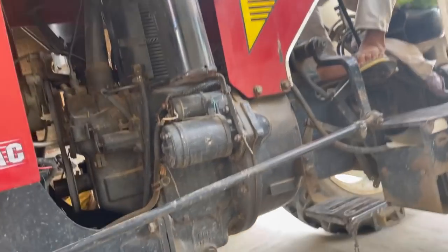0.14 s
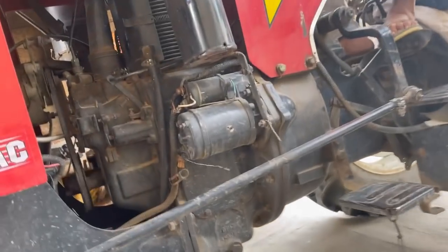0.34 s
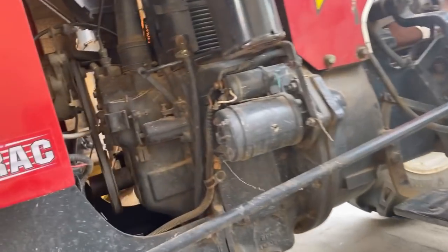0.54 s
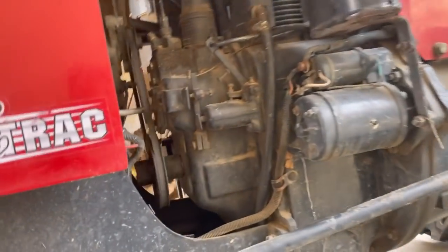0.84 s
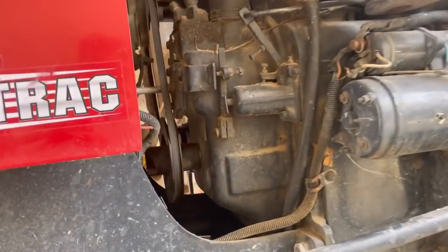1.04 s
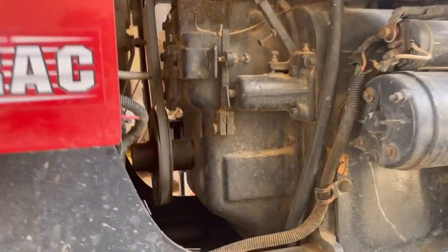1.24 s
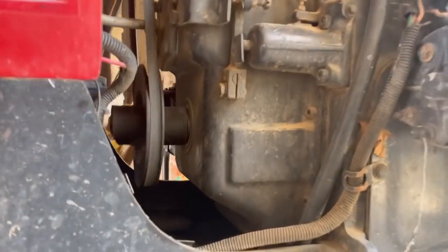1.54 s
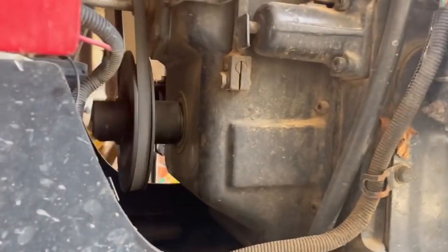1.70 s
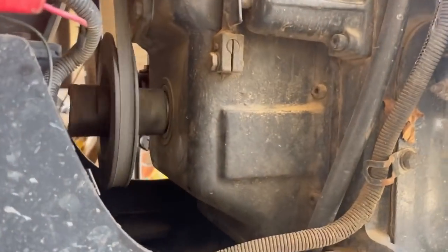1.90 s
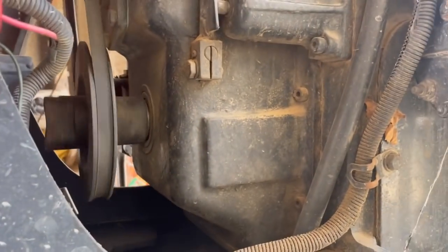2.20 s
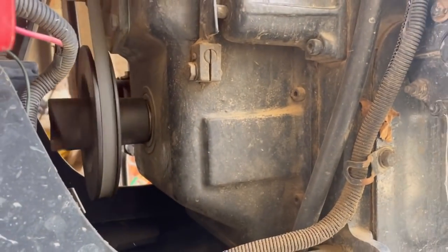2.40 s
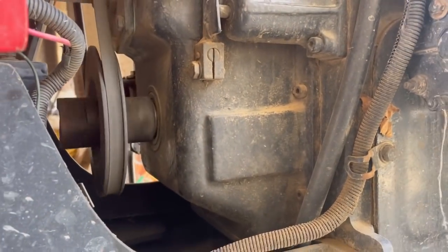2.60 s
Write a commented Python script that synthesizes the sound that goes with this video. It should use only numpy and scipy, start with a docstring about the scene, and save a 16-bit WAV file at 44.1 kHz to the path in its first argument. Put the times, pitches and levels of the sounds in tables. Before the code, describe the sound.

Close tractor engine idle: steady hollow thumps, metallic ticks, loose clanks and a few hard knocks.

```python
"""A single-cylinder tractor diesel idles at about seven cycles a second, heard from close beside the block.
Gusty low rumble and gear clatter run throughout; each cycle brings a hollow thump, then injector, valve and
tappet ticks. It fires hard early on: a knock, and a bright metal clack one crank turn later. Loose parts clank
through the middle; two more hard firings follow. Metal is rung modes; the rest is coloured noise and low tones."""
import sys
import numpy as np
from scipy import signal
from scipy.fft import rfft, irfft
from scipy.io import wavfile

SR = 44100
rng = np.random.default_rng(int(sys.argv[2]) if len(sys.argv) > 2 else 0)


def dump(signal):
    """Clip the signal to [-1, 1] and save it as 16-bit WAV at the path in sys.argv[1]."""
    limited = np.clip(np.atleast_2d(signal).T, -1, 1)
    pcm = np.round(limited * 32767).astype(np.int16)
    wavfile.write(sys.argv[1], SR, pcm)


N = 121275
TIME_S = np.arange(N) / SR
FREQ_HZ = np.maximum(np.arange(N // 2 + 1) * SR / N, 1)

# All dB are relative: each source adds its own gain.
# deep rumble level: time_s, level_db
DEEP_LEVEL = [(0.0, -23), (0.03, -34), (0.08, -36), (0.24, -23.5), (0.39, -26), (0.47, -26), (0.58, -25),
              (0.66, -34), (0.78, -21.5), (0.8, -32), (0.9, -31.5), (0.95, -23.5), (1.07, -25), (1.26, -28),
              (1.39, -25), (1.42, -37), (1.51, -23), (1.54, -30.5), (1.65, -29.5), (1.78, -45), (1.9, -22),
              (2.14, -30), (2.25, -28), (2.27, -23), (2.38, -31), (2.75, -35.5)]
# low boom level: time_s, level_db
BOOM_LEVEL = [(0.0, -37), (0.13, -45), (0.16, -27), (0.47, -26.5), (0.59, -44), (0.63, -27), (0.98, -34.5),
              (1.0, -24), (1.16, -43), (1.29, -22.5), (1.55, -35), (1.6, -22), (1.78, -30), (1.92, -21.5),
              (2.1, -38), (2.21, -23.5), (2.33, -30.5), (2.75, -32)]
# rumble and boom spectra: freq_hz, density_db
DEEP_COLOUR = [(15, -34), (31, -22), (40, -1), (55, -3), (80, -4.5), (110, -10.5), (160, -16), (400, -59)]
BOOM_COLOUR = [(50, -43), (100, -6), (125, -5), (165, -2.5), (205, -10.5), (300, -18), (800, -59)]
# low throbs: centre_s, pitch_hz, half_length_s (to 1/e), level_db
THROBS = [(0.022, 44, 0.032, -19.5), (0.192, 68, 0.017, -21.5), (.312, 48, 0.054, -22),
          (.32, 103, 0.02, -20.5), (0.345, 165, 0.012, -22), (0.447, 132, 0.025, -19),
          (0.732, 162, 0.018, -24.5), (1.006, 158, .022, -20), (1.069, 61, 0.057, -21),
          (1.606, 166, .03, -20.5), (1.998, 66, 0.017, -17.5), (2.218, 163, .024, -21),
          (2.275, 60, 0.019, -15.5)]
# midrange rattle spectrum: freq_hz, density_db
MIDRANGE_COLOUR = [(300, -30), (750, -2), (1000, -3.5), (1300, 0), (1900, -5.5), (4000, -36)]
# midrange rattle level: time_s, level_db
MIDRANGE_LEVEL = [(0, -47), (.55, -39), (.75, -34), (1.0, -31), (1.35, -32.5), (1.75, -39), (2.75, -41)]
# clatter and drone level: time_s, level_db
RUNNING_LEVEL = [(0, -2), (.1, -1), (.3, -2.5), (.55, -1), (.78, -1), (.95, 2), (1.1, -1), (1.3, 1.5),
                 (1.58, 2.5), (1.73, 0), (1.9, 0.5), (2.1, -0.5), (2.4, 0), (2.75, -3)]
# gear clatter and drone spectra: freq_hz, density_db
CLATTER_COLOUR = [(100, -14.5), (400, 1), (900, -1), (1500, 0.5), (2200, -2), (3000, -3.5), (4300, -3),
                  (5300, -18.5), (6500, -24), (8500, -27), (12000, -29), (16000, -68)]
DRONE_COLOUR = [(60, -31), (130, -2), (220, -5), (400, 3.5), (620, -4.5), (900, -4), (1400, -6.5),
                (2500, -11.5), (5000, -23.5), (16000, -59)]
# resonances of block and covers: freq_hz, width_hz, gain_db
BLOCK = [(263.3, 17, 5), (308, 12, -15), (494, 71, -9), (767, 85, -0.5), (869, 28, -6), (1139, 20, 6.5),
         (1374, 24, -7.5), (1559, 35, 2.5), (1757, 12, 2.5), (1916, 13, 3.5), (2094, 10, 1.5),
         (2545, 200, -2), (3175, 13, 5), (3469, 22, 3.5), (4740, 41, 2), (5310, 29, 9), (7340, 23, 0)]
# engine cycles: start_s, thump_db, injector_db, valve_db, tappet_db, swell_db
CYCLES = [(-.047, -21, -1, -13, -11, -12), (.092, -16, 2, -2, -3, -3.5), (.228, -7, -0.5, -8, -4.5, -2),
          (.365, -10, -10, -14, -6, 0.5), (.499, -10, -0.5, -3, 0, 1), (.638, -6, 2, -3, -3, 0),
          (.781, -5, 1.5, -0.5, -3, 4.5), (.920, -2.5, 3, -10, -1, 0), (1.066, -5.5, -1.5, 3, -4, -1),
          (1.212, -1, 5.5, -5, 1, 1.5), (1.366, -3.5, 4, 4.5, -2.5, -2.5), (1.519, -4.5, 8, -1, 1.5, 1),
          (1.679, -1.5, 4, 9, -2.5, 1.5), (1.838, -1.5, -1, 3, 7, -1), (1.989, -5, -7, -4, -6, -0.5),
          (2.136, -6, 1, -1, 0, -2.5), (2.279, -3.5, 1, -2, -3, 1.5), (2.415, -4.5, 0, -15, -1.5, -2.5),
          (2.553, -8, -4, -1, -2, 2.5), (2.696, -4, 1, -2, 0, 0.5), (2.838, -4, -2, -4, -2, 19)]
# light tappet ticks late in each cycle: cycle_share, level_db
TAPPETS = [(.73, 1.5), (.88, -2), (.99, -5.5)]
# tick, thud, clack and scrape spectra: freq_hz, density_db
TICK_COLOUR = [(300, -21), (1500, 2), (3500, 1.5), (5500, -2.5), (7000, -1.5), (8600, -0.5), (10500, -1.5),
               (13000, -5), (16000, -24)]
THUD_COLOUR = [(40, -28), (130, -18), (300, -2), (600, 0.5), (1000, -1.5), (1600, -7), (2500, -17.5),
               (5000, -52), (16000, -53)]
CLACK_COLOUR = [(200, 0), (900, -5), (1600, 3.5), (2600, 2), (4000, -5.5), (5500, -4.5), (7500, -12),
                (8700, -6), (10500, -9), (13000, -14), (16000, -38)]
SCRAPE_COLOUR = [(2000, -27), (7000, 4), (11000, 5), (13500, 1), (16000, -14)]
# loose parts clanking: start_s, level_db, loudest_hz
CLANKS = [(.658, -3.5, 3080), (.709, 1, 940), (.738, 0.5, 1350), (.774, -1, 3380), (.905, -3, 1760),
          (0.975, -1, 1230), (1.109, 0.5, 1350), (1.243, 3, 1245), (1.551, 2.5, 3400), (1.627, -1.5, 2900),
          (1.771, 1, 2590)]
# hard firings: knock_s, knock_db, knock_loudest_hz, crack_db, clack_s, clack_db, clack_loudest_hz
FIRINGS = [(.1228, -4.5, 426, -10, .191, -10.5, 1990), (1.872, 1, 700, 0.5, 1.9475, -1.5, 2670),
           (2.165, -3, 620, -2, 2.2338, -7.5, 2340)]
# ringing of thump, clank, knock, hollow tail and clack: pitch_hz, level_db, t60_s
THUMP_MODES = [(164, -7.5, 0.068), (260.7, 3, 0.14), (390, -11, 0.099), (550, -12, 0.055), (730, 6, 0.087),
               (765, -2, 0.045), (840, -7, 0.12), (1120, -23.5, 0.17)]
CLANK_MODES = [(881, 2, .15), (954, -1.5, .1), (1236, -1.5, .12), (1350, -3, 0.16), (1758, 3, 0.2),
               (2580, -1, 0.11), (2930, -4, 0.11), (3150, -5, 0.12), (3420, 1, 0.12)]
KNOCK_MODES = [(414, -5, 0.11), (509, -1, 0.15), (581, -5.5, 0.27), (770, -20, 0.022), (838, -8.5, 0.097),
               (910, -7, .09), (985, -6.5, 0.11), (1144, -2, 0.12), (1237, -10.5, 0.24), (1560, -3.5, 0.2),
               (1820, -17, .15), (2150, -21, .17)]
TAIL_MODES = [(319, 4, .17), (370, -3, 0.11), (450, -18, 0.073), (576, -16, 0.11)]
CLACK_MODES = [(1510, -9, .12), (1845, -4, 0.091), (2066, 1, 0.11), (2386, 3, 0.091), (2575, 3.5, 0.11),
               (2940, -5, 0.15), (3020, -8, 0.091), (3730, -2.5, .11), (4000, -4, 0.17), (5280, -7.5, .1),
               (7330, 1, 0.15)]
# two microphone ports: freq_hz, likeness (0-1), left_lead_rad, left_minus_right_db
PORTS = [(39.8, 0.95, 0, -0.5), (150, 1, -0.85, 1.4), (328, 0.92, 0.02, 1.4), (690, 0.61, 0.48, 1),
         (1410, 0.2, 1.22, 3), (2640, 0.3, 0.33, 0.7), (5030, 0.46, 0.56, 5.5), (6900, 0.43, 1.25, 0),
         (7650, 0.83, 4, 2.5), (10050, 1, 2, -2.5), (11200, 0.57, 1.9, 2.5), (12800, 1, -1.5, -1),
         (16000, 1, 1.5, 2)]

DEEP_DB, BOOM_DB = -1.5, -2.5
DRONE_DB, IMPACTS_PER_S, IMPACT_SCATTER_DB = -26.5, 1100, 3.5
CLATTER_DB, SWELL_DB, SWELL_AT_SHARE = -27, 3, 0.86  # share: of the cycle
BAY_RISE_S, BAY_T60_S, BAY_RIPPLE = 0.0017, 0.05, 0.59  # ripple: exponent on the echo spectrum
TICK_DB, TICK_SCATTER_DB, TICK_RISE_S, TICK_T60_S, TICK_JITTER_S = -35, 1, 0.0023, 0.16, 0.0029
INJECTOR_AT_SHARE, VALVE_AT_SHARE = 0.18, 0.46  # share: of the cycle
STRIKE_RISE_S = .0015
CLANK_DB = -21.5
CLANK_FALL_DB_PER_OCT, KNOCK_FALL_DB_PER_OCT, CLACK_FALL_DB_PER_OCT = 21, 3, 10
THUMP_SPREAD, KNOCK_SPREAD = 0.4, 0.87  # gain of ringing on the unshared paths
THUMP_DB, THUMP_RISE_S, THUMP_DETUNE = -16.5, 0.0037, .022  # detune: sd, fraction of pitch
THUMP_THUD_DB, THUMP_THUD_T60_S = -27, 0.066
SHAKE_HZ, SHAKE_DB, SHAKE_T60_S, SHAKE_RISE_S, SHAKE_LEAD_S = 48, -18, 0.19, 0.012, 0.024
KNOCK_DB, TAIL_DB, TAIL_RISE_S = -8.8, -9.5, 0.033
KNOCK_THUD_DB, KNOCK_THUD_T60_S, CRACK_DB, CRACK_T60_S = -11, .16, -17.5, .08
CLACK_RING_DB, CLACK_NOISE_DB, CLACK_RISE_S, CLACK_T60_S = -9.5, -10.5, .004, .09
SCRAPE_DB, SCRAPE_LEAD_S, SCRAPE_T60_S = -20.5, 0.0037, 0.19
TOP_HZ = 15800


def undb(db):
    """Decibels to gain."""
    return 10 ** (np.asarray(db) / 20)


def unit(x):
    """Scale to rms 1."""
    return x / np.sqrt(np.mean(x ** 2))


def curve(table, axis=1):
    """One column of a time table, joined by straight lines."""
    rows = np.array(table)
    return np.interp(TIME_S, rows[:, 0], rows[:, axis])


def across(table, axis=1):
    """One column of a frequency table, interpolated on a log axis."""
    rows = np.array(table)
    return np.interp(np.log(FREQ_HZ), np.log(rows[:, 0]), rows[:, axis])


def white(channels=3):
    """White noise on three paths: shared by both ports, left only, right only."""
    return rng.standard_normal((channels, N))


def colour(x, spectrum, resonances=()):
    """Give x a spectrum and ringing resonances; rms 1 over all paths."""
    ringing = 1
    for hz, width_hz, db in resonances:
        ringing = ringing + undb(db) / (1 + 2j * (FREQ_HZ - hz) / width_hz)
    return unit(irfft(rfft(x) * undb(across(spectrum)) * ringing, N))


def blow(start_s, rise_s, t60_s):
    """Envelope of a blow: linear rise, then exponential decay."""
    age_s = np.maximum(TIME_S - start_s, 0)
    decay = np.exp(-np.log(1000) * np.maximum(age_s - rise_s, 0) / t60_s)
    return np.minimum(age_s / rise_s, 1) * decay


def blows_envelope(blows, rise_s, t60_s):
    """Sum of the envelopes of (start_s, level_db) blows."""
    return sum(undb(db) * blow(start_s, rise_s, t60_s) for start_s, db in blows)


def ring(blows, modes, rise_s, spread=1, detune=0.0074, channels=3):
    """Decaying sines rung by each (start_s, level_db) blow, with fresh detuning and phase each time."""
    out = np.zeros((channels, N + 2 * SR))  # 1 s margin each side
    age_s = np.arange(SR // 3) / SR
    for start_s, level_db in blows:
        at = SR + int(start_s * SR)
        for hz, db, t60_s in modes:
            pitch_hz = hz * (1 + detune * rng.standard_normal())
            turns = pitch_hz * age_s + rng.random((channels, 1))
            fade = np.minimum(age_s / rise_s, 1) * np.exp(-np.log(1000) * age_s / t60_s)
            out[:, at:at + len(age_s)] += undb(level_db + db) * fade * np.sin(2 * np.pi * turns)
    return out[:, SR:SR + N] * np.array([[1], [spread], [spread]])


def strike(start_s, level_db, loudest_hz, modes, fall_db_per_oct):
    """A sharp blow; the modes near its loudest pitch ring most."""
    near = []
    for hz, db, t60_s in modes:
        octaves = abs(np.log2(hz / loudest_hz))
        near.append((hz, db - fall_db_per_oct * octaves, t60_s))
    return ring([(start_s, level_db)], near, STRIKE_RISE_S, KNOCK_SPREAD)


def bay(x):
    """Close metal surfaces blur each contact into a short wash and ripple its spectrum."""
    echoes = rfft(white() * blow(0, BAY_RISE_S, BAY_T60_S))
    return irfft(rfft(x) * echoes / np.abs(echoes) ** (1 - BAY_RIPPLE), N)


def impacts():
    """A dense hail of tiny metal contacts of uneven size, at random instants."""
    hit = rng.random(N) < IMPACTS_PER_S / SR
    return white() * hit * undb(IMPACT_SCATTER_DB * rng.standard_normal(N))


def rumble():
    """Deep rumble and low boom: band noise that comes and goes in gusts."""
    deep = undb(DEEP_DB + curve(DEEP_LEVEL)) * colour(white(), DEEP_COLOUR)
    boom = undb(BOOM_DB + curve(BOOM_LEVEL)) * colour(white(), BOOM_COLOUR)
    return deep + boom


def throbs():
    """Short low sine throbs under bell-shaped envelopes, each at its own pitch."""
    out = 0
    for centre_s, hz, half_length_s, db in THROBS:
        bell = np.exp(-((TIME_S - centre_s) / half_length_s) ** 2)
        tone = np.sin(2 * np.pi * (hz * TIME_S + rng.random((3, 1))))
        out = out + undb(db) * bell * tone
    return out


def midrange():
    """A dense midrange rattle of blurred impacts that swells and recedes."""
    return undb(curve(MIDRANGE_LEVEL)) * colour(bay(impacts()), MIDRANGE_COLOUR)


def clatter():
    """Gears and loose parts rattle the block, swelling once a cycle over a duller, even drone."""
    phase = np.interp(TIME_S, np.array(CYCLES)[:, 0], np.arange(len(CYCLES)))
    swell_db = SWELL_DB * np.cos(2 * np.pi * (phase - SWELL_AT_SHARE)) + curve(CYCLES, axis=5)
    gears = undb(CLATTER_DB) * colour(bay(impacts()) * undb(swell_db), CLATTER_COLOUR, BLOCK)
    drone = undb(DRONE_DB) * colour(bay(impacts()), DRONE_COLOUR, BLOCK)
    return (gears + drone) * undb(curve(RUNNING_LEVEL))


def clanks():
    """Loose parts strike out of the clatter, each favouring the modes near its own pitch."""
    return undb(CLANK_DB) * sum(strike(*row, CLANK_MODES, CLANK_FALL_DB_PER_OCT) for row in CLANKS)


def ticks():
    """Injector, valve and tappets tick near fixed shares of the cycle; noise through the block."""
    power = 0
    for (start_s, _, injector_db, valve_db, tappet_db, _), (end_s, *_) in zip(CYCLES, CYCLES[1:]):
        events = [(INJECTOR_AT_SHARE, injector_db), (VALVE_AT_SHARE, valve_db)]
        events += [(share, tappet_db + own_db) for share, own_db in TAPPETS]
        for share, db in events:
            late, strong = rng.standard_normal(2)
            when_s = start_s + share * (end_s - start_s) + TICK_JITTER_S * late
            level = undb(db + TICK_SCATTER_DB * strong)
            power = power + (level * blow(when_s, TICK_RISE_S, TICK_T60_S)) ** 2
    return undb(TICK_DB) * np.sqrt(power) * colour(bay(white()), TICK_COLOUR, BLOCK)


def thumps():
    """Each cycle's hollow thump: rung modes and a noise thud; the engine shakes just ahead of it."""
    blows = [row[:2] for row in CYCLES]
    early = [(start_s - SHAKE_LEAD_S, db) for start_s, db in blows]
    shake = ring(early, [(SHAKE_HZ, SHAKE_DB, SHAKE_T60_S)], SHAKE_RISE_S)
    body = undb(THUMP_DB) * ring(blows, THUMP_MODES, THUMP_RISE_S, THUMP_SPREAD, THUMP_DETUNE)
    envelope = blows_envelope(blows, THUMP_RISE_S, THUMP_THUD_T60_S)
    thud = undb(THUMP_THUD_DB) * envelope * colour(white(), THUD_COLOUR)
    return shake + body + thud


def knocks():
    """A hard firing: short crack, thud, and the block ringing on into a lower, hollow tail."""
    blows = [row[:2] for row in FIRINGS]
    cracks = [(row[0], row[3]) for row in FIRINGS]
    tail = undb(TAIL_DB) * ring(blows, TAIL_MODES, TAIL_RISE_S, THUMP_SPREAD)
    body = undb(KNOCK_DB) * sum(strike(*row[:3], KNOCK_MODES, KNOCK_FALL_DB_PER_OCT) for row in FIRINGS)
    thud_envelope = undb(KNOCK_THUD_DB) * blows_envelope(blows, STRIKE_RISE_S, KNOCK_THUD_T60_S)
    thud = thud_envelope * colour(white(), THUD_COLOUR)
    crack_envelope = undb(CRACK_DB) * blows_envelope(cracks, STRIKE_RISE_S, CRACK_T60_S)
    crack = crack_envelope * colour(white(), TICK_COLOUR)
    return crack + thud + body + tail


def clacks():
    """Bright metal clack one crank turn after a hard firing: thin scrape, noise burst, rung modes."""
    blows = [row[4:6] for row in FIRINGS]
    early = [(start_s - SCRAPE_LEAD_S, db) for start_s, db in blows]
    burst_envelope = undb(CLACK_NOISE_DB) * blows_envelope(blows, CLACK_RISE_S, CLACK_T60_S)
    burst = burst_envelope * colour(bay(white()), CLACK_COLOUR)
    scrape_envelope = undb(SCRAPE_DB) * blows_envelope(early, STRIKE_RISE_S, SCRAPE_T60_S)
    scrape = scrape_envelope * colour(white(), SCRAPE_COLOUR)
    ringing = sum(strike(*row[-3:], CLACK_MODES, CLACK_FALL_DB_PER_OCT) for row in FIRINGS)
    return scrape + burst + undb(CLACK_RING_DB) * ringing


def scene():
    """All sources reach two ports; likeness, phase lead and level difference vary with frequency."""
    engine = clatter() + midrange() + thumps() + ticks() + clanks()
    paths = rfft(engine + throbs() + knocks() + clacks() + rumble())
    likeness = np.clip(across(PORTS), 0, 1)
    sides = np.array([[1], [-1]])  # left, right
    shared = np.sqrt(likeness) * paths[0] * np.exp(.5j * sides * across(PORTS, axis=2))
    unshared = np.sqrt(1 - likeness) * paths[1:]
    return irfft((shared + unshared) * undb(sides * across(PORTS, axis=3) / 2), N)


def record(dry):
    """The recorder clips peaks below full scale, then a steep low-pass cuts the top."""
    low_pass = signal.ellip(10, .2, 80, TOP_HZ, fs=SR, output="sos")
    return signal.sosfilt(low_pass, np.clip(dry, -.96, .96))


dry = scene()
out = record(dry)
dump(out)
```